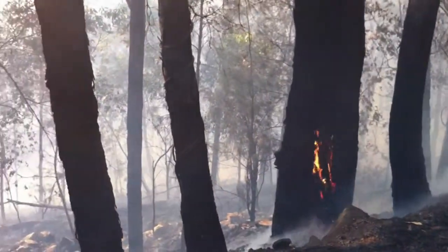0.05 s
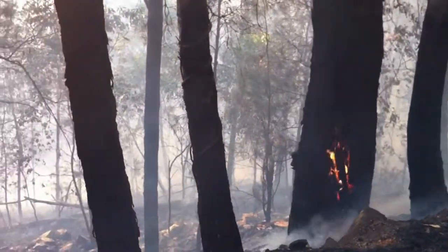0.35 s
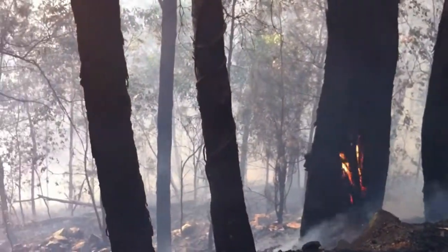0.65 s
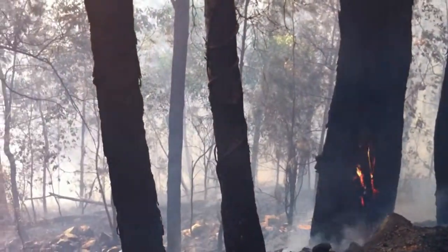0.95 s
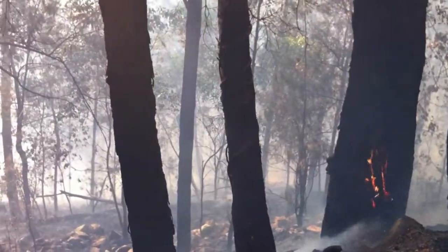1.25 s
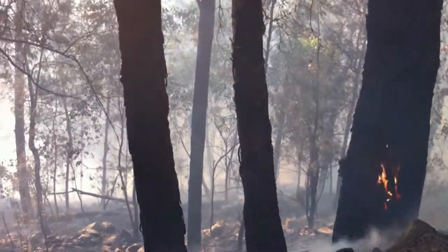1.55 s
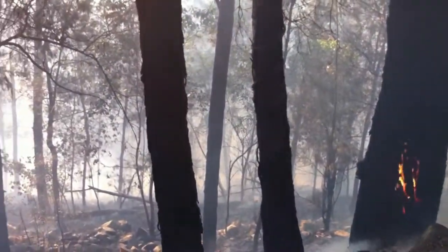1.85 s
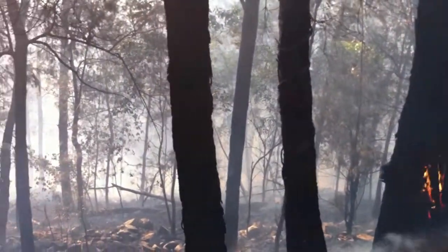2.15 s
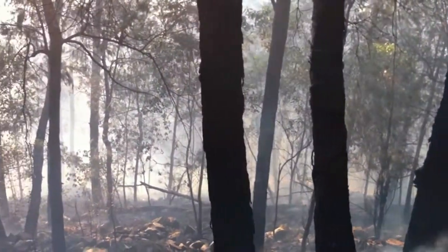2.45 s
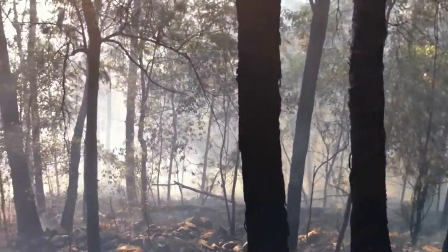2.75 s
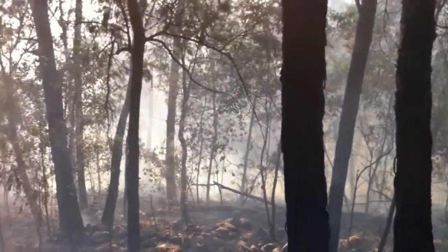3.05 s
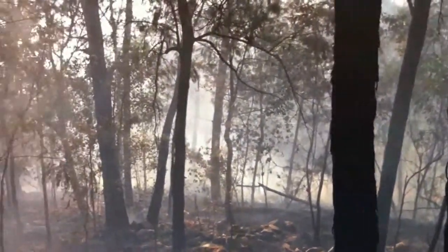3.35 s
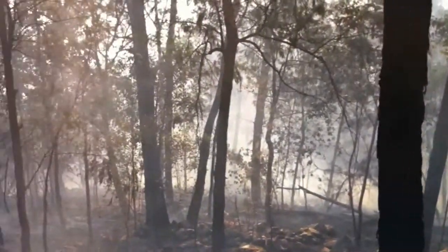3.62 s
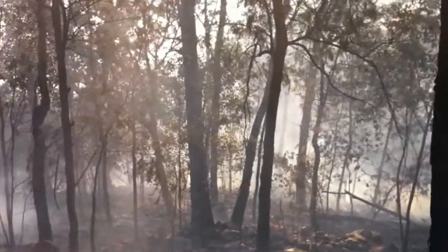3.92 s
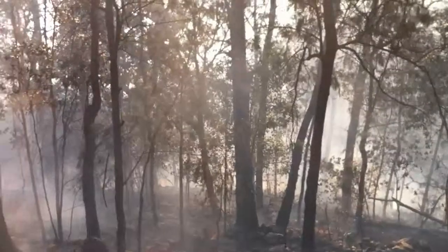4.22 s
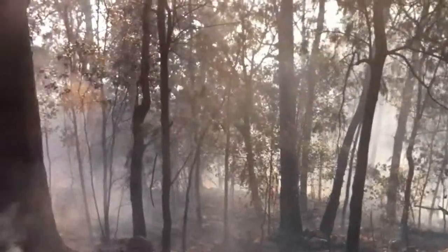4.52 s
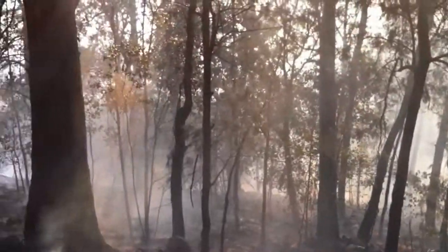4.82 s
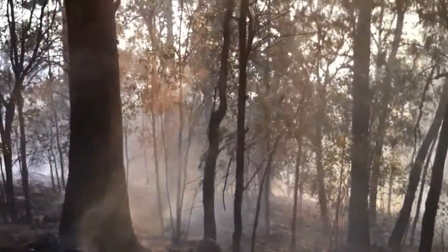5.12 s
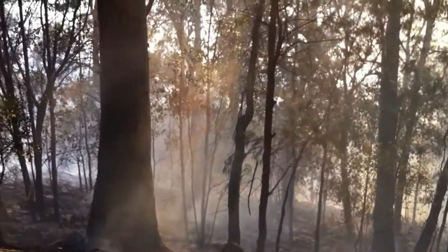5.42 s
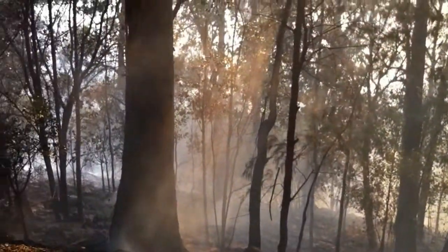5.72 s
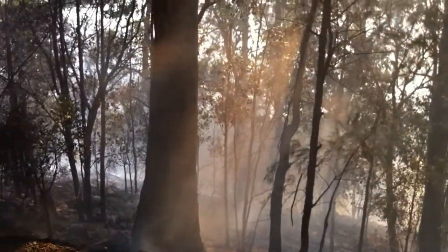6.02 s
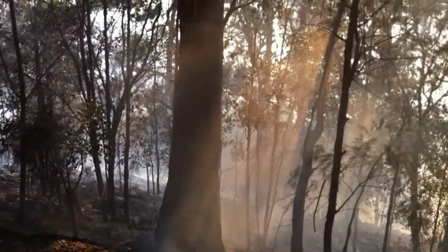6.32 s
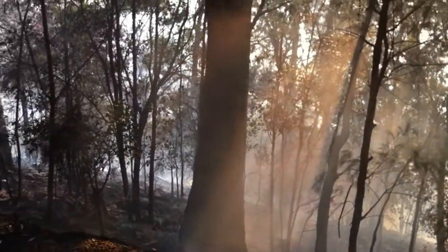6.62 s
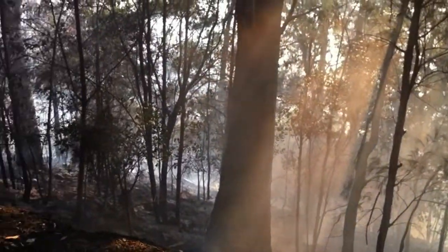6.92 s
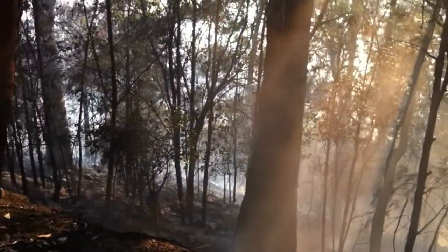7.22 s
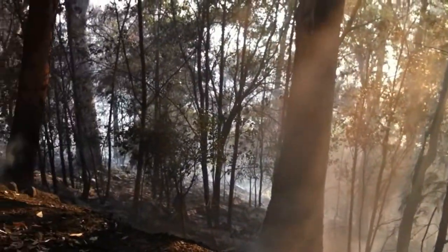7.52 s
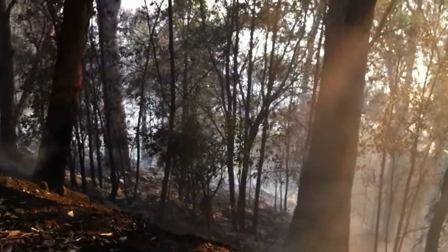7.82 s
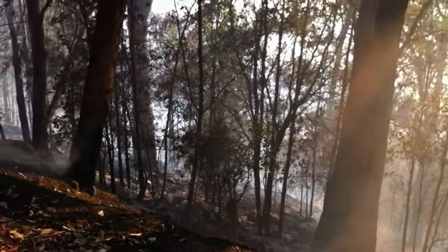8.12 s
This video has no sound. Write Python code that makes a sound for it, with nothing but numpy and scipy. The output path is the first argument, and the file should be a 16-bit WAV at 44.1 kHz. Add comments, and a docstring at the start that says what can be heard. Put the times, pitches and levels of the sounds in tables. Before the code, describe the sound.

In an open burnt forest, trunks and undergrowth smoulder a few metres from the microphone, with a soft hiss, tiny ticks and a low rumble of air. Wind thuds on the microphone at first, and one sharp, loud snap bursts close by. Dry cracks and small twig pops with brief echoes follow, busiest around the middle, then thin out as the wind eases.

```python
"""An open, burnt forest: trunks and undergrowth smoulder a few metres from a hand-held microphone.
Tiny embers tick over a steady hiss and a low rumble of air. Wood cracks and the trees scatter each
crack; a gas pocket bursts close by and hollow twigs ring as they pop. Puffs of wind buffet the
microphone, mostly early on, and a far bird starts one falling note at the end."""
import sys
import numpy as np
from scipy import signal
from scipy.fft import rfft, irfft
from scipy.io import wavfile
from scipy.ndimage import uniform_filter1d

SR = 44100
rng = np.random.default_rng(int(sys.argv[2]) if len(sys.argv) > 2 else 0)


def wav_out(sig):
    """Save sig, one row per channel (or a flat mono array), as 16-bit PCM at SR to the path in sys.argv[1]."""
    wavfile.write(sys.argv[1], SR, np.round(np.clip(np.atleast_2d(sig).T, -1, 1) * 32767).astype(np.int16))


N = 359856
T = np.arange(N) / SR
TOP_HZ = 15900

# Ember activity. Each row: time in seconds, sizzle in dB, hiss in dB (both before trims).
GLOW = [(0.0, -71, -64.5), (0.48, -69, -64), (1.43, -70, -65), (2.3, -65.5, -63.5), (3.95, -66.5, -65),
        (4.52, -70, -66), (4.93, -69.5, -64.5), (6.5, -71.5, -66), (7.25, -71, -65.5), (8.16, -71, -66)]
# Light air between gusts, with one lull. Each row: time in seconds, breeze in dB, deep draught in dB.
LIGHT_AIR = [(0, -66.5, -92), (3.8, -68, -88), (4.6, -73, -93), (5.3, -76, -93), (5.8, -67.5, -86),
             (6.5, -68.5, -78), (8.16, -72, -79)]


def undb(db):
    """Decibels to gain."""
    return 10 ** (np.asarray(db) / 20)


def unit(x):
    """Scale to rms 1."""
    return x / np.sqrt(np.mean(x ** 2))


def curve(table, column):
    """One table column, interpolated over time."""
    table = np.array(table)
    return np.interp(T, table[:, 0], table[:, column])


def add(out, start_s, x):
    """Mix x into out."""
    i = max(int(start_s * SR), 0)
    out[i:i + len(x)] += x[:max(len(out) - i, 0)]


def response(spectrum, size=4096):
    """Minimum-phase impulse response from (Hz, dB) points."""
    hz, db = np.transpose(spectrum)
    gain = undb(np.interp(np.log(np.fft.rfftfreq(size, 1 / SR) + 1), np.log(hz), db))
    cepstrum = irfft(np.log(gain))
    cepstrum[1:size // 2] *= 2
    cepstrum[size // 2 + 1:] = 0
    return irfft(np.exp(rfft(cepstrum)))


def colour(x, spectrum):
    """Filter x by (Hz, dB) points."""
    return signal.fftconvolve(x, response(spectrum))[:len(x)]


def noise(spectrum):
    """Coloured noise, rms 1."""
    return unit(colour(rng.standard_normal(N), spectrum))


def band(x, lo_hz, hi_hz):
    """Butterworth band-pass."""
    sos = signal.butter(2, [lo_hz, min(hi_hz, 0.45 * SR)], "band", fs=SR, output="sos")
    return signal.sosfilt(sos, x)


def wander(rate_hz):
    """Smooth random drift, rms 1."""
    step = int(SR / rate_hz)
    stairs = np.repeat(rng.standard_normal(N // step + 1), step)
    return unit(uniform_filter1d(stairs, step)[:N])


def ticks(per_s, spread_db):
    """Random tiny fractures, many small and few large."""
    chance, size, sign = rng.random(N), rng.exponential(size=N), rng.choice([-1, 1], N)
    return (chance < per_s / SR) * sign * undb(spread_db * np.minimum(size, 4))


def embers(hiss_trim_db=-2.5, sizzle_trim_db=1.4, tick_db=-4.5, smooth_db=-2.5, bunch_db=3):
    """Smouldering wood hisses; splinters tick in irregular bunches, bark and leaves crumble."""
    # Spectra. Each row: frequency in Hz, relative density in dB.
    hiss_spectrum = [(800, -14.5), (2000, -3), (4000, 0.5), (7000, -2), (10000, -16.5), (16000, -11)]
    sizzle_spectrum = [(2000, 2), (5000, -9), (9000, -2), (11000, -6), (13500, 4), (16000, 4.5)]
    # Crumbling. Each row: centre in seconds, half-width in seconds, level in dB, pitch in Hz.
    flurries = [(1.618, 0.027, -65, 2600), (2.594, 0.014, -62, 9000), (3.623, 0.057, -63, 3620),
                (3.63, 0.033, -67, 10000), (3.627, 0.038, -63, 1400), (3.915, 0.074, -64.5, 4970),
                (5.04, 0.016, -63, 4500), (5.168, 0.014, -60.5, 4460), (5.218, .02, -64.5, 4000)]
    hiss = noise(hiss_spectrum) * undb(curve(GLOW, column=2) + hiss_trim_db + 0.96 * wander(11))
    ticks_per_s = 260 * undb(bunch_db * wander(30))
    grains = sum(band(ticks(ticks_per_s, spread_db=4), hz / 1.4, hz * 1.4)
                 for hz in np.geomspace(4000, 13500, 5))
    sizzle_db = curve(GLOW, column=1)
    # Ticks stand out more in lively embers.
    tick_gain = undb(tick_db + 0.44 * (sizzle_db - sizzle_db.max()))
    fizz = unit(grains) * tick_gain + rng.standard_normal(N) * undb(smooth_db)
    sizzle = unit(colour(fizz, sizzle_spectrum)) * undb(sizzle_db + sizzle_trim_db + 1.8 * wander(40))
    out = hiss + sizzle
    for centre_s, width_s, db, hz in flurries:
        crumbs = band(ticks(per_s=2000, spread_db=3), hz / 1.7, hz * 1.34)
        out += unit(crumbs) * undb(db) * np.exp(-((T - centre_s) / width_s) ** 2)
    return out


def wind_strength(attack_s=0.028, release_s=0.047, wander_db=2.5):
    """Wind amplitude at the microphone: light air plus gusts that rise, hold and die away."""
    # Each row: start of hold in seconds, hold in seconds, level in dB.
    gusts = [(0.046,0.041,-51), (0.203,.18,-50), (0.471,0.061,-50), (0.655,0.21,-50.5), (0.986,0.15,-45.5),
             (1.16,0.12,-51), (1.3,0.11,-55), (1.867,0.029,-55), (2.37,0.12,-54.5), (2.957,0.042,-51.5),
             (3.338,0.025,-54), (3.647,0.026,-57), (3.84,0.044,-61), (4.267,.03,-64.5), (4.41,.04,-60.5),
             (5.605,0.086,-61), (6.223,.03,-61.5), (6.43,.04,-58.5), (6.723,0.041,-58), (7.145,0.043,-62),
             (7.463,0.03,-59.5), (7.947,0.03,-59), (8.09,0.029,-57)]
    power = undb(curve(LIGHT_AIR, column=1) + wander_db * wander(7)) ** 2
    for start_s, hold_s, db in gusts:
        fade = np.maximum(start_s - T, 0) / attack_s + np.maximum(T - start_s - hold_s, 0) / release_s
        power += (undb(db) * np.exp(-fade)) ** 2
    return np.sqrt(power)


def air(strength):
    """Gusty breeze and deep draught on the microphone, over the distant forest's rumble and wash."""
    # Spectra. Each row: frequency in Hz, relative density in dB.
    breeze_spectrum = [(20, -34), (40, -24), (70, -9), (125, 2), (180, -3), (300, -14.5), (450, -29),
                       (800, -50.5)]
    rumble_spectrum = [(30, -47), (70, -30), (110, -16), (150, -1), (195, 0.5), (300, -5), (430, -14.5),
                       (700, -38), (1500, -35.5)]
    wash_spectrum = [(50, -19), (200, -7.5), (450, -3.5), (680, 1), (950, -3.5), (1600, -4.5), (2500, -8),
                     (5000, -17), (10000, -27.5)]
    # Each row: time in seconds, rumble in dB, wash in dB.
    far_levels = [(0, -60.5, -64.5), (2, -58.5, -63.8), (3.8, -58.5, -63), (4.7, -57, -63.5),
                  (5.3, -59.5, -63), (6.3, -59.5, -64.5), (8.16, -62.5, -63.5)]
    breeze = noise(breeze_spectrum) * strength * undb(wander(25))
    draught = unit(band(rng.standard_normal(N), lo_hz=50, hi_hz=95))
    draught *= undb(curve(LIGHT_AIR, column=2) + 4 * wander(11))
    rumble = noise(rumble_spectrum) * undb(curve(far_levels, column=1) + 1.5 * wander(20))
    wash = noise(wash_spectrum) * undb(curve(far_levels, column=2) + 0.5 * wander(5))
    return breeze + draught + rumble + wash


def eddy(db, hz, edge_db, cycles=0.76, edge_hz=410, edge_s=0.0014, size=2048):
    """One or two swings of pressure, with a brief knock from the steep edge."""
    t = (np.arange(size) - size / 2) / SR
    phase = rng.random()
    swing = np.exp(-(hz * t / cycles) ** 2) * np.cos(2 * np.pi * (hz * t + phase))
    edge = np.exp(-(t / edge_s) ** 2) * np.cos(2 * np.pi * (edge_hz * t + phase))
    return undb(db) * (swing + undb(edge_db) * edge)


def buffets(strength, count=400, over_breeze_db=4, spread_db=3, pitch_hz=156.5, small_edge_db=-23):
    """Hard eddies thud on the microphone; a stream of small ones follows the wind strength."""
    # Each row: centre in seconds, level in dB, pitch in Hz, edge relative to swing in dB.
    hard_eddies = [(.106,-41,145,-25), (.201,-40,160,-15), (.253,-34,132,-24), (0.311,-31.5,150,-31),
                   (.326,-35,140,-27), (0.344,-28,194,-13), (.365,-32,192,-13), (0.378,-29,173,-15),
                   (0.476,-31.5,188,-17), (0.487,-31,208,-9), (.494,-31.5,200,-13), (.753,-39.5,288,-14),
                   (0.765,-28.5,185,-20), (0.844,-24,250,-21), (0.989,-24.5,141,-15),
                   (0.997,-28.5,325,-5.5), (1.011,-30.5,282,-10), (1.02,-27.5,174,-22),
                   (1.031,-33.5,160,-18), (1.081,-30,202,-14), (1.11,-29,178,-16), (1.123,-37,152,-24),
                   (1.133,-29,153,-28), (1.186,-38,165,-23), (2.378,-31.5,196,-22), (2.399,-35.5,161,-20),
                   (2.424,-42,175,-20), (2.471,-39,169,-25), (3.239,-35.5,178,-26), (3.373,-36,164,-14),
                   (8.092,-43.5,156,-22)]
    times_s = (np.arange(count) + rng.random(count)) / count * T[-1]
    size, detune = rng.standard_normal((count, 2)).T
    levels_db = 20 * np.log10(np.interp(times_s, T, strength)) + over_breeze_db + spread_db * size
    small_eddies = zip(times_s, levels_db, pitch_hz * undb(1.5 * detune), np.full(count, small_edge_db))
    out = np.zeros(N)
    for centre_s, db, hz, edge_db in [*hard_eddies, *small_eddies]:
        thud = eddy(db, hz, edge_db)
        add(out, centre_s - len(thud) / 2 / SR, thud)
    return out


def scatter(early_s, late_s, late_db, rise_s=0.00045, size=8192):
    """Grainy echoes of unit energy: a quick spray off ground and bark, then a tail from the trees."""
    t = np.arange(size) / SR
    grains = rng.standard_normal(size) * undb(3 * rng.standard_normal(size))
    decay = np.exp(-t / early_s) + undb(late_db) * np.exp(-t / late_s)
    echo = grains * decay * (1 - np.exp(-t / rise_s))
    return echo / np.linalg.norm(echo)


def crack(db, bright_db, scatter_db, fibres_db=-16, fibres_s=0.0007):
    """One sharp break and a brief tearing of fibres, followed by their echoes."""
    # Each row: frequency in Hz, base gain in dB, share of bright_db added.
    shape = [(500,-6,-1.1), (1050,2,-1.2), (1690,9,-1), (2720,-0.5,-.5), (3880,5.5,-.1), (5500,3.5,-0.4),
             (7500,4,-0.018), (10200,1.5,0.34), (13600,5,1), (16000,10,0.82)]
    echo = scatter(early_s=0.0069, late_s=0.051, late_db=-15)
    t = np.arange(len(echo)) / SR
    tear = undb(fibres_db) * rng.standard_normal(len(t)) * np.exp(-t / fibres_s)
    tear[0] = 1  # the break
    spectrum = [(hz, db + base_db + share * bright_db) for hz, base_db, share in shape]
    return colour(tear / np.linalg.norm(tear) + undb(scatter_db) * echo, spectrum)


def cracks(faint_count=20, faint_db=-45, spread_db=1.5, crowding=3.0):
    """Burning wood cracks; faint random cracks crowd where the embers sizzle most."""
    # Each row: start in seconds, gain in dB, brightness in dB, echo relative to break in dB.
    distinct_cracks = [(0.0152,-40,4,-12), (0.5427,-37.5,8,-12), (.676,-39,3,-10), (1.06,-41,2,0),
                       (1.187,-43,3,-7), (1.5911,-31,9,-4), (1.603,-37,-2,1), (1.6128,-43,10,-1),
                       (1.7332,-46,9,2), (1.8195,-47,6,-6), (1.947,-38,11,2.5), (2.0526,-30.5,7.5,2.5),
                       (2.1078,-40,1,-8), (2.2592,-36,-3,2), (2.262,-36,-5,5), (2.2656,-37,-4,-3),
                       (2.303,-39,0,-6), (2.3556,-36.5,2,-10), (2.4693,-42,7,-8), (2.548,-38,3,-1),
                       (2.5593,-39,8,-10), (2.581,-35,2,-3), (2.606,-37,3,-11), (2.6366,-39,4,-4),
                       (2.6885,-45,5,-7), (2.742,-39,0,4), (2.7437,-36.5,8,-2), (2.8593,-38,-4,-6),
                       (2.9959,-39,7,-4), (3.0038,-40,4,-8), (3.0891,-41.5,5,-4), (3.14,-33,1,3),
                       (3.1427,-31,0,0), (3.3603,-34,-1,-3), (3.4328,-37,5,-8), (3.607,-36,0.5,3.5),
                       (3.651,-42,0,-3), (3.7805,-27,3,-5), (3.817,-38.5,-4,-6), (3.927,-35,2,2),
                       (3.9735,-36,3,-6), (4.0256,-37.5,4,-2), (4.0587,-26.5,2,-4), (4.2035,-40,4,-7),
                       (4.23,-36,-1,-5), (4.3093,-40,-6,-3), (4.3112,-40,4,0), (4.51,-42,-2,2),
                       (4.6418,-39.5,3,-6), (4.795,-43,6,-5), (5.177,-39,-5,-3), (5.3586,-41.5,10,-8),
                       (5.702,-45,-8,0), (5.8572,-31.5,1.5,-11), (6.0505,-37,1,0), (6.0683,-37,4,-5),
                       (6.9427,-45,5,1), (7.123,-44,-2,1), (7.7074,-34,1.5,-4), (7.7985,-42,-5,0)]
    out = np.zeros(N)
    for start_s, db, bright_db, scatter_db in distinct_cracks:
        add(out, start_s, crack(db, bright_db, scatter_db))
    activity = np.cumsum(undb(crowding * curve(GLOW, column=1)))
    for quantile, size in zip(rng.random(faint_count), rng.standard_normal(faint_count)):
        start_s = np.interp(quantile, activity / activity[-1], T)
        add(out, start_s, crack(faint_db + spread_db * size, bright_db=3, scatter_db=-3))
    return out


def snap(start_s=0.6097, pulse_db=-3.5, echo_db=-17.2, thump_db=-19, thump_hz=185, thump_s=0.002):
    """A gas pocket bursts close by: one sharp pulse, a short low thump, a rustling tail of echoes."""
    # Spectra. Each row: frequency in Hz, relative density in dB.
    pulse_spectrum = [(40, 3), (260, 1.5), (600, -2), (1000, -5), (1270, -16.5), (1750, -0.5), (2150, -13),
                      (2450, -5), (2750, -21), (3450, 5), (3800, -6), (4250, 7.5), (5200, -1), (6100, -10),
                      (7200, 2.5), (9500, -4), (11700, 2.5), (12500, -17), (16000, 3)]
    echo_spectrum = [(500, -4), (2000, 2), (4500, 7), (9000, 8), (13500, 9), (15800, 1)]
    pulse = response(pulse_spectrum)
    t = np.arange(len(pulse)) / SR
    thump = band(np.sin(2 * np.pi * thump_hz * t) * np.exp(-t / thump_s), lo_hz=110, hi_hz=1030)
    echo = colour(scatter(early_s=0.016, late_s=0.036, late_db=0), echo_spectrum)
    out = np.zeros(N)
    add(out, start_s, undb(pulse_db) * pulse / np.linalg.norm(pulse) + undb(thump_db) * thump)
    add(out, start_s, undb(echo_db) * echo / np.linalg.norm(echo))
    return out


def twig_pops():
    """Hollow twigs pop: each ring swells and lasts a few cycles, its overtones dying sooner."""
    # Each row: start in seconds, gain in dB, pitch in Hz, ring time in seconds, tilt in dB per octave.
    pops = [(1.777,-49.5,9050,0.00046,-10), (2.2595,-47,1520,.0012,-16), (2.2604,-45,870,.0012,-1),
            (2.2638,-45,2250,.0009,-8), (2.331,-50,1320,0.0015,-14), (2.7425,-49,2060,0.0011,-14),
            (3.165,-47,7500,0.00046,-12), (3.53,-48.5,844,0.0015,-2), (3.817,-46,3700,0.00055,-12),
            (4.5095,-46,4050,0.00037,-11), (5.176,-44,3900,.00065,-9), (5.7012,-41,1330,0.00066,-17),
            (5.7015,-43,1850,0.00046,-12), (5.8575,-48,3150,.0004,2), (7.7068,-48,760,.0007,-16),
            (7.707,-32,1860,0.00052,-2)]
    # Each row: multiple of the pitch, gain in dB, share of the ring time.
    modes = [(1,-3,0.97), (1.88,-5,0.64), (3.75,-3,0.35), (5.0,-3.5,0.42), (7.9,-13,0.41)]
    out = np.zeros(N)
    t = np.arange(SR // 20) / SR
    for start_s, db, hz, ring_s, tilt_db in pops:
        for multiple, mode_db, share in modes:
            if hz * multiple < TOP_HZ:
                gain = undb(db + mode_db + tilt_db * np.log2(multiple))
                age = t / (ring_s * share)
                add(out, start_s, gain * np.sin(2 * np.pi * hz * multiple * t) * age * np.exp(1 - age))
    return out


def bird():
    """A far, pure whistle that slides down."""
    # Each row: time in seconds, pitch in Hz, rms level in dB.
    note = [(8.095, 1560, -95), (8.11, 1490, -64), (8.135, 1450, -55.5), (8.16, 1390, -59)]
    envelope = np.sqrt(2) * undb(curve(note, column=2)) * (T > note[0][0])
    return envelope * np.sin(2 * np.pi * np.cumsum(curve(note, column=1)) / SR)


def scene():
    """Fire, air and bird at one microphone."""
    strength = wind_strength()
    return (snap() + twig_pops() + embers() + air(strength) + buffets(strength) + cracks() + bird())[None]


def record(dry):
    """The microphone colours the treble and the recorder cuts the top."""
    # Each row: frequency in Hz, gain in dB.
    mic_spectrum = [(1200, 0.5), (1950, 2.5), (2700, -2.5), (3400, 2.5), (4000, 4.5), (5000, 2.5),
                    (6100, 1.5), (7300, 4.5), (10500, 4.5), (14000, 0), (16000, -7.5)]
    low_pass = signal.ellip(10, 0.2, 70, TOP_HZ, fs=SR, output="sos")
    return signal.sosfilt(low_pass, colour(dry[0], mic_spectrum))[None]


dry = scene()
out = record(dry)
wav_out(out)
```